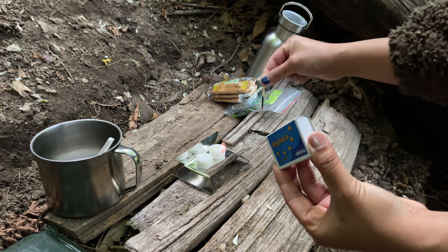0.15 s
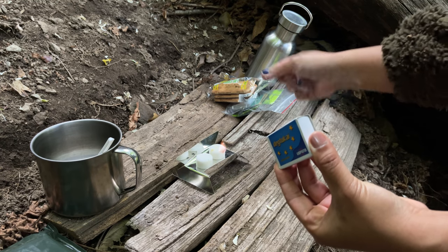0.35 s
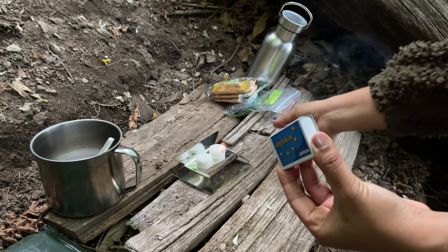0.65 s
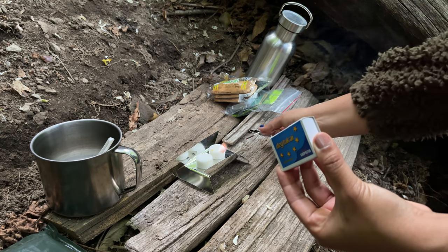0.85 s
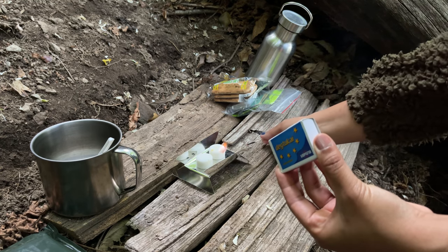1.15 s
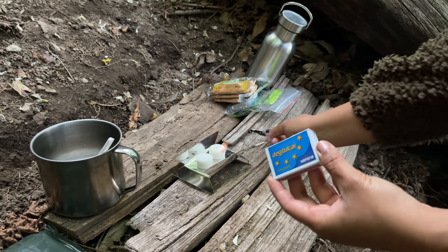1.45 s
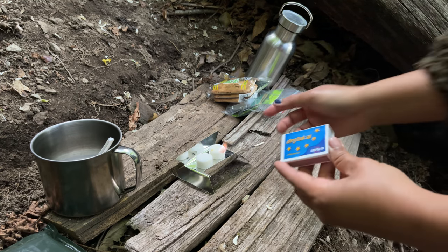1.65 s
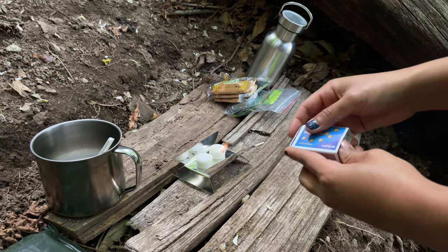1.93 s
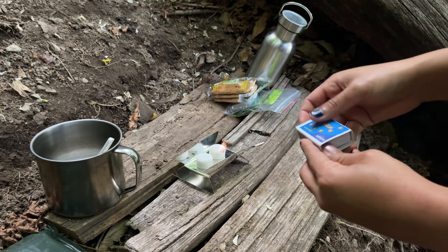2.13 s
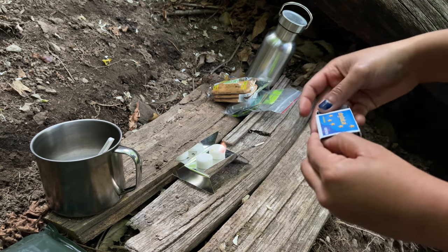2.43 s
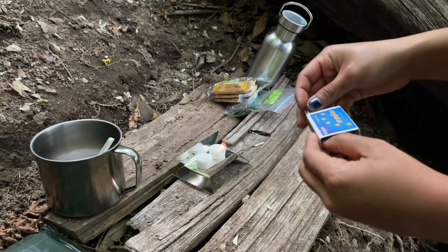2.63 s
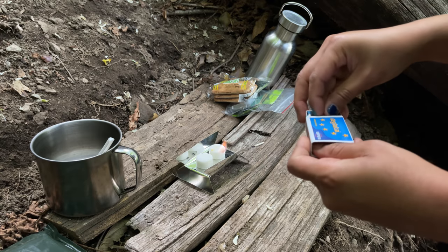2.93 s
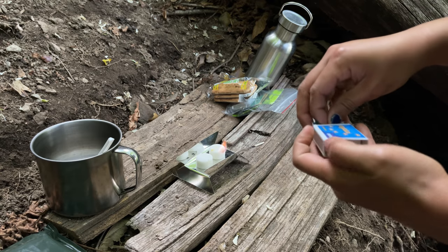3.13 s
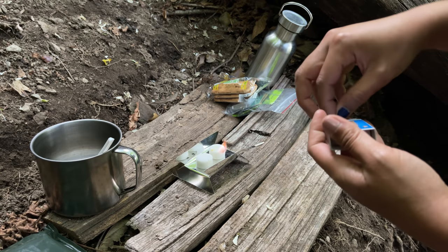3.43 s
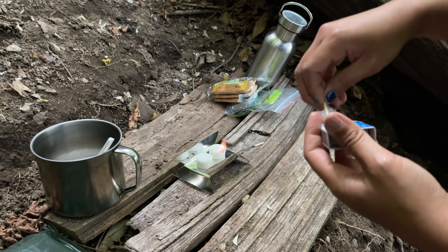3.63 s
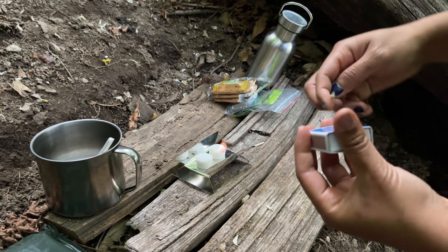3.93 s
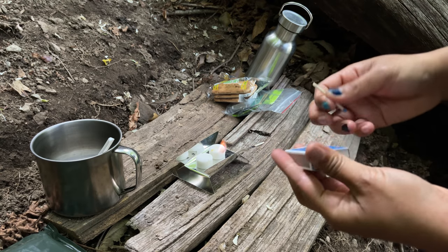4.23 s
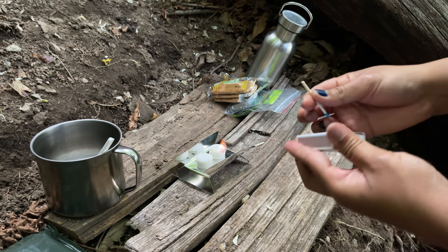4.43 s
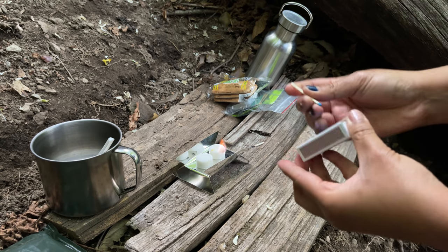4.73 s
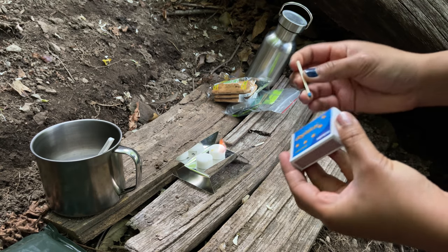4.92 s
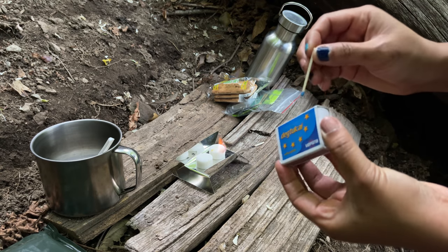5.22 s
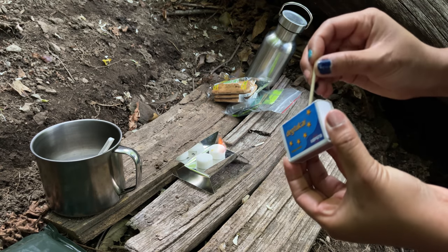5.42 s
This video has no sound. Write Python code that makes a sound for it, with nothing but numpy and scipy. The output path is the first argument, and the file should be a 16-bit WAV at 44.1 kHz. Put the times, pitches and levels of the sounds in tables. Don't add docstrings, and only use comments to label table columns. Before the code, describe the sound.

A cardboard matchbox is handled close to a phone in quiet woodland. Faint crickets and leaf hush run throughout; far birds whistle early and a nearby bird gives two quick rising chirps. Rubs and light ticks grow into a busy rattle around three seconds, then a sharp, bright snap of the tray just before four, followed by sparser scuffs and a final click.

```python
import sys
import numpy as np
from scipy import signal
from scipy.fft import rfft, irfft
from scipy.io import wavfile
from scipy.ndimage import uniform_filter1d

SR = 44100
rng = np.random.default_rng(int(sys.argv[2]) if len(sys.argv) > 2 else 0)


def unload_wav(signal):
    wavfile.write(
        sys.argv[1],
        SR,
        np.round(np.clip(np.atleast_2d(signal).T, -1, 1) * 32767).astype(np.int16),
    )


def field_ratio(decibels):
    return 10 ** (np.asarray(decibels, dtype=float) / 20)


N = 245637
TIME = np.arange(N) / SR
LEFT_RIGHT = np.array([[1], [-1]])


def noise():
    return rng.standard_normal(N)


def unit(x):
    return x / np.sqrt(np.mean(x ** 2))


def span(start_s, end_s):
    return slice(max(int(start_s * SR), 0), int(end_s * SR))


def lowpass(x, hz):
    return signal.lfilter(*signal.butter(2, hz, fs=SR), x)


def highpass(x, hz):
    return signal.sosfilt(signal.butter(4, hz, "high", fs=SR, output="sos"), x)


def band(x, hz, width_hz):
    return signal.lfilter(*signal.iirpeak(hz, hz / width_hz, SR), x)


def body(x, modes):
    total = 0
    for k, (hz, width_hz, db) in enumerate(modes):
        total = total + (-1) ** k * field_ratio(db) * band(x, hz, width_hz)
    return unit(total)


def walk(rate_hz):
    size = int(SR / rate_hz)
    held = np.repeat(rng.standard_normal(N // size + 1), size)
    return unit(uniform_filter1d(uniform_filter1d(held, size), size)[:N])


def bell(size, edge):
    u = np.linspace(0, 1, size)
    return np.sin(np.pi / 2 * np.clip(np.minimum(u, 1 - u) / edge, 0, 1)) ** 2


def scatter(x, t60_s, wet_db, cross_db, dull_hz):
    t = TIME[:SR // 2]
    decay = np.exp(-np.log(1000) * t / t60_s) * np.clip(t / 0.0017, 0, 1)
    lumps = field_ratio(2.0 * walk(500)[:len(t)]) * decay
    mid, side = rng.standard_normal((2, len(t))) * lumps
    tails = field_ratio(wet_db) / np.sqrt(np.sum(mid ** 2)) * np.array([mid, field_ratio(cross_db) * side])
    mid, side = signal.oaconvolve(x[None], lowpass(tails, dull_hz), axes=1)[:, :N]
    return x + mid + side * LEFT_RIGHT


# frequency in Hz, density in dB per Hz.
HUSH_COLOUR = [(12, -35), (20, 2.5), (48, -6), (98, -8), (466, -10.5), (550, -15), (1310, -13),
               (1590, -11.5), (1820, -10.5), (3010, -6), (3560, -5.5), (5260, -11), (7550, -14),
               (8440, -16), (14300, -34.5), (15600, -35)]
# frequency in Hz, side minus mid in dB.
HUSH_WIDTH = [(60, -2.5), (110, -1.5), (200, -3.5), (380, -7.5), (700, -5.5), (1290, -8.5), (2380, -19),
              (4400, -10), (8120, 0), (15000, -7)]


def hush():
    log_hz = np.log(np.fft.rfftfreq(N, 1 / SR) + 1)
    colour_hz, colour_level_db = np.transpose(HUSH_COLOUR)
    width_hz, width_level_db = np.transpose(HUSH_WIDTH)
    colour_db = np.interp(log_hz, np.log(colour_hz), colour_level_db)
    side_db = np.interp(log_hz, np.log(width_hz), width_level_db)
    mid = irfft(rfft(noise()) * field_ratio(colour_db), N)
    side = irfft(rfft(noise()) * field_ratio(colour_db + side_db), N)
    side = side + 0.18 * lowpass(mid, 300)
    leaves = field_ratio(-59.5 + 0.5 * walk(0.78)) * (mid + side * LEFT_RIGHT) / np.std(mid)
    breeze = np.array([field_ratio(db + 8.7 * np.tanh(walk(4.6))) * walk(50) for db in (-84, -86)])
    return leaves + breeze


# tone in Hz, width in Hz, chirps per second, level in dB, side share 0-1.
CRICKET_VOICES = [
    (7804, 140, 63, -69.5, 0.8),
    (6780, 200, 64.4, -68.5, 0.54),
    (5770, 350, 61, -71.5, 0.7),
    (7320, 410, 77, -71.5, 0.8),
]


def crickets():
    out = 0
    for hz, width_hz, rate_hz, db, side_share in CRICKET_VOICES:
        beat = np.sin(2 * np.pi * np.cumsum(rate_hz * (1 + 0.008 * walk(3))) / SR)
        stroke = (0.5 + 0.5 * beat) ** 1.2 + 0.2

        def wing():
            tone = np.sin(2 * np.pi * np.cumsum(hz + 0.3 * width_hz * walk(90)) / SR)
            rasp = unit(band(band(noise(), hz, width_hz), hz, 2.9 * width_hz))
            return unit(stroke * (tone + 0.36 * rasp))

        mid, side = wing(), wing()
        out = out + field_ratio(db + 0.8 * walk(1.96)) * (mid + side_share * side * LEFT_RIGHT)
    return out


def chatter():
    notes, note_s = 70, 0.025
    when, pitch, bend, length, size = rng.random((notes, 5)).T
    start_s = when * (N / SR - 3 * note_s)
    hz = 2300 + 1900 * pitch
    return list(zip(start_s, note_s * (0.5 + length), hz, hz * (0.88 + 0.24 * bend), -70 + 7 * size))


# start in seconds, length in seconds, first Hz, last Hz, level in dB.
FAR_WHISTLES = [(0.209, 0.029, 2840, 2610, -58), (0.241, 0.021, 2630, 2930, -59.5),
                (0.258, 0.082, 3040, 3040, -61), (0.346, 0.045, 2500, 2300, -63),
                (.475, .015, 3820, 3800, -54), (0.489, 0.031, 3500, 3580, -59.5),
                (0.572, 0.025, 5540, 4700, -61), (0.587, 0.071, 4640, 4430, -55.5),
                (0.685, 0.033, 3850, 3450, -59), (0.849, 0.14, 3210, 3070, -58.5),
                (0.989, 0.073, 2650, 2790, -60.5), (1.05, 0.034, 2190, 2128, -60.5),
                (1.19, 0.06, 3204, 3123, -59.5), (1.246, 0.081, 3210, 3260, -56.5),
                (1.293, 0.053, 2350, 2350, -61), (1.34, 0.063, 2350, 2020, -54.5),
                (1.41, 0.06, 2043, 2205, -60.5), (1.348, 0.053, 2700, 2810, -57),
                (1.746, 0.116, 2650, 2653, -59), (1.8, 0.14, 2552, 2580, -56),
                (1.988, 0.16, 2660, 2663, -58.5), (2.094, 0.032, 3650, 3410, -56),
                (2.38, 0.092, 2290, 2330, -57), (2.461, 0.071, 2310, 1965, -57),
                (2.658, 0.11, 2600, 2540, -59), (1.467, 0.073, 2250, 2282, -62),
                (1.557, 0.089, 2050, 1760, -63)]
# start in seconds, length in seconds, centre in Hz, width in Hz, level in dB.
FAR_TRILLS = [
    (3.925, 0.084, 3000, 400, -68),
    (4.264, 0.18, 2840, 453, -62.5),
    (4.75, 0.14, 2870, 450, -62.5),
    (5.027, 0.096, 5000, 450, -66),
]


def far_birds():
    out, breath = np.zeros(N), noise()
    waver = 1 + 0.013 * walk(90) + 0.01194 * walk(18)
    flutter = field_ratio(2.0 * walk(70))
    for start, length, first_hz, last_hz, db in FAR_WHISTLES + chatter():
        at = span(start, start + length)
        hz = np.interp(TIME[at], [start, start + length], [first_hz, last_hz]) * waver[at]
        out[at] += field_ratio(db - 0.5) * bell(len(hz), edge=0.13) * np.sin(2 * np.pi * np.cumsum(hz) / SR)
    for start, length, hz, width_hz, db in FAR_TRILLS:
        at = span(start, start + length)
        hoarse = unit(band(band(breath[at], hz, width_hz), hz, width_hz))
        out[at] += field_ratio(db + 1.0) * bell(len(hoarse), edge=0.11) * hoarse
    return scatter(out * flutter, t60_s=0.57, wet_db=2.0, cross_db=-37, dull_hz=6000)


def heartbeat():
    first_s, every_s, again_s, length_s = 0.26, 0.935, 0.24, 0.07
    late = (TIME - first_s + every_s / 4) % every_s - every_s / 4
    nudges = sum(np.exp(-((late - s) / length_s) ** 2) for s in (0, again_s))
    return field_ratio(np.array([[-65], [-67]])) * nudges * walk(25)


# start in seconds, swell in seconds, peak in dB, after-note in dB, after-note in Hz.
CALLS = [
    (1.0, 0.07, -39, -49.5, 6550),
    (3.189, 0.064, -39, -62, 6270),
]
# delay in seconds, level in dB.
TRUNK_ECHOES = [
    (0.044, -7),
    (0.082, -7.5),
    (.118, -11.5),
]


def near_bird():
    first_hz, top_hz, glide_s = 3650, 6398, 0.026
    after_wait_s, after_length_s = 0.026, 0.047
    out, octave = np.zeros(N), np.zeros(N)
    flutter_db = 7.5 * np.tanh(walk(400))
    for start, swell, peak_db, after_db, after_hz in CALLS:
        at = span(start, start + swell + 0.04)
        t = TIME[at] - start
        hz = top_hz - (top_hz - first_hz) * np.exp(-t / glide_s)
        phase = 2 * np.pi * np.cumsum(hz) / SR
        swell_db = -13 * np.clip(1 - t / swell, 0, 1) ** 1.07
        cut_db = -1500 * np.maximum(t - swell, 0)
        gain = field_ratio(peak_db + swell_db + cut_db + flutter_db[at]) * np.clip(t / 0.0083, 0, 1)
        out[at] = gain * np.sin(phase)
        octave[at] = field_ratio(-38.5) * gain * np.sin(2 * phase)
        after_s = start + swell + after_wait_s
        at = span(after_s, after_s + after_length_s)
        note = np.sin(2 * np.pi * after_hz * TIME[at])
        out[at] += field_ratio(after_db + flutter_db[at]) * bell(len(note), edge=0.5) * note
    soft = lowpass(out, 2800)
    out = out + sum(field_ratio(db + 9.0) * np.roll(soft, int(late * SR)) for late, db in TRUNK_ECHOES)
    return (scatter(out, t60_s=0.38, wet_db=14.5, cross_db=-3.0, dull_hz=2500)
            + scatter(octave, t60_s=0.53, wet_db=12.0, cross_db=-1, dull_hz=15000))


# time in seconds, peak in dB, ring in Hz.
PANEL_HITS = [(1.423, -41, 2150), (1.75, -33, 2620), (1.799, -38, 2610), (2.4626, -38, 2250),
              (2.9178, -24, 2360), (3.056, -23.5, 2380), (3.0844, -32, 2290), (3.2818, -33, 2520),
              (3.338, -32, 2450), (3.417, -29, 2380), (3.4302, -26.5, 2300), (3.449, -28, 2250),
              (3.4648, -27.5, 2350), (4.075, -42.5, 2020), (4.7182, -50, 2410), (5.403, -37, 1670),
              (5.4184, -35, 2100), (5.425, -30, 1940), (5.443, -19.5, 2300), (5.4552, -42, 2230),
              (5.485, -41, 2050)]
# time in seconds, peak in dB, ring in Hz.
EDGE_HITS = [(1.2729, -34, 3240), (1.712, -33, 2800), (1.7399, -27.5, 3320), (2.3433, -30, 2980),
             (2.8984, -29, 3300), (3.0706, -30, 3520), (4.339, -33.5, 2920), (4.4475, -29, 3000),
             (4.7674, -34, 2850), (5.391, -33.5, 2800), (5.447, -23, 2830), (5.4674, -36, 3430)]
# time in seconds, peak in dB, ring in Hz.
TRAY_HITS = [(1.507, -34, 3820), (1.7863, -30.5, 4700), (2.456, -25.5, 4800), (2.9315, -23, 3760),
             (3.339, -28.5, 4500), (3.4924, -29, 4200), (3.5084, -29, 4170), (3.601, -38, 4130),
             (3.624, -34.5, 4100), (3.803, -35, 4220), (4.4542, -25, 4040), (4.4685, -27, 4160),
             (4.9277, -36, 4100), (4.9727, -28, 3920), (5.0234, -44, 5050), (5.2914, -34.5, 3900),
             (5.315, -33, 4040)]
# time in seconds, peak in dB, ring in Hz.
MATCH_CATCHES = [(2.862, -38, 2500), (2.8747, -22, 3050), (2.886, -29, 2390), (2.908, -24.5, 3600),
                 (2.9427, -23, 2410), (2.981, -35, 2840), (2.991, -27.5, 2380), (2.993, -32, 4740),
                 (3.043, -35, 2500), (3.060, -29, 3980), (3.3735, -34, 4540), (3.379, -31.5, 2420),
                 (3.383, -30, 4270), (3.425, -30, 2340), (3.432, -28, 5240), (3.853, -29.5, 2150),
                 (3.874, -22, 2150), (3.887, -23, 8000), (3.892, -18, 7800), (3.898, -19, 8900),
                 (3.906, -20, 8900), (3.912, -20, 4480), (4.458, -29, 4200), (4.4595, -31, 6300),
                 (4.4653, -34, 1780), (4.473, -29, 4320), (4.485, -29, 7000), (4.500, -40, 1770),
                 (4.933, -40, 3800), (4.955, -35, 3930), (4.960, -32.5, 3000), (4.9917, -33.5, 4270),
                 (4.999, -40, 3900), (5.161, -41, 3920), (5.433, -37, 1560), (5.4715, -38, 3420),
                 (2.370, -30, 4120), (1.753, -40, 4350)]
# sharpness in dB, t60 in seconds, rise in seconds.
STRUCK_PARTS = [
    (-18.5, 0.013, 0.00052),
    (-15.5, 0.0097, 0.00069),
    (-27, 0.0072, 0.0005),
    (-21, 0.013, 0.0013),
]
# time in seconds, peak in dB, ring in Hz, sharpness in dB.
NAIL_SNAPS = [(1.257, -32.5, 3330, -4), (2.0935, -39, 7000, 4), (3.8688, -26, 1970, -22),
              (3.892, -22, 4260, -17), (3.8987, -22, 4070, -3), (3.903, -18, 4040, -14),
              (3.9067, -20, 4660, -14), (3.9415, -34, 6440, 4), (4.4877, -30, 4130, -6),
              (3.4415, -38, 8500, -5), (3.0724, -32, 6700, 0), (4.5188, -28, 2850, -1.5),
              (4.7439, -27.5, 3830, 0)]


def knocks():
    rows = []
    for hits, part in zip((PANEL_HITS, EDGE_HITS, TRAY_HITS, MATCH_CATCHES), STRUCK_PARTS):
        rows += [(*hit, *part) for hit in hits]
    snap_t60_s, snap_rise_s = 0.0088, 0.00037
    return rows + [(*snap, snap_t60_s, snap_rise_s) for snap in NAIL_SNAPS]


def ticks():
    out, t = np.zeros(N + SR), np.arange(SR // 20) / SR
    for start, peak_db, hz, sharp_db, t60_s, rise_s in knocks():
        chance = rng.standard_normal(len(t))
        fade = np.exp(-np.log(1000) * t / t60_s) * np.clip(t / rise_s, 0, 1) ** 2
        fade = fade / fade.max()
        ring = np.sin(2 * np.pi * hz * t) * fade
        rattle = band(band(chance, 1.06 * hz, 3800), 2750, 4500) * fade ** 0.65
        crack = band(band(chance, 6900, 7500), 4500, 10000) * fade ** 1.9
        crack = field_ratio(0.66 * sharp_db + 7.5) * lowpass(lowpass(crack, 12500), 12500)
        i = int(start * SR)
        out[i:i + len(t)] += field_ratio(peak_db - 4.5) * (lowpass(ring + rattle, 8000) + crack)
    return out[:N]


# firmest in seconds, rise in seconds, fall in seconds, level in dB, brightness in dB.
DRAGS = [(1.877, 0.017, 0.036, -56.5, -6), (2.016, 0.077, 0.051, -51, 3), (2.172, 0.038, 0.046, -50, 3.5),
         (2.29, 0.11, .017, -56.5, 6), (2.337, 0.043, 0.024, -47.5, 3.5), (2.37, 0.028, 0.029, -45.5, -1),
         (2.457, 0.037, 0.062, -52.5, -1.5), (2.592, 0.034, 0.077, -50.5, -5),
         (2.755, 0.0065, 0.055, -48, 6), (2.915, 0.028, 0.03, -41, 2.5), (3.149, 0.032, 0.048, -48, -6),
         (3.432, 0.029, 0.021, -41, 2), (3.511, 0.021, 0.047, -50.5, -7), (3.587, .041, 0.012, -56, -2),
         (3.622, 0.034, 0.012, -49, -6), (3.806, 0.057, 0.021, -58, 3), (3.897, 0.036, 0.0043, -34.5, 7),
         (3.913, 0.0095, 0.0032, -32.5, 9), (4.133, 0.031, 0.025, -54, 2), (4.232, 0.047, 0.043, -49.5, 0),
         (4.341, 0.062, 0.037, -65.5, 15), (4.472, 0.033, 0.027, -51, 0), (4.59, 0.049, 0.082, -54, -1),
         (4.745, 0.032, 0.034, -48, -1), (4.963, 0.02, 0.019, -46, -1.5)]
# firmest in seconds, length in seconds, level, brightness in dB.
QUICK_SCUFFS = [(1.265, 0.036, -51, 0), (1.51, 0.031, -54, -10), (1.703, 0.05, -58, -7),
                (1.742, 0.046, -60, -8), (1.789, 0.033, -53.5, -7), (1.833, 0.039, -58, -12),
                (1.967, 0.033, -49, -15), (2.098, 0.068, -56, 0), (2.872, 0.04, -42.5, 6),
                (2.936, 0.024, -42, -2), (2.956, 0.041, -48.5, -4), (2.99, 0.03, -42, -4),
                (3.019, 0.046, -47.5, -4), (3.054, 0.046, -44, 2), (3.081, 0.02, -48, 5.5),
                (3.102, 0.036, -46.5, -9), (3.246, 0.03, -49.5, 4), (3.346, 0.054, -56, -11),
                (3.379, 0.022, -46, -13), (3.467, 0.077, -51, -4), (3.859, 0.036, -45.5, -3),
                (3.874, 0.048, -36.5, -5), (3.928, 0.022, -48, 3), (4.456, 0.024, -46.5, 0),
                (4.992, 0.03, -53, -5), (5.172, 0.03, -53.5, -4), (5.3, 0.071, -63, -14),
                (5.42, 0.024, -65, -8), (5.451, 0.014, -43, -11), (5.466, 0.012, -44, -3)]
# panel, tray, paper in dB per dB.
BRIGHTNESS_SLOPES = (-0.35, 0.37, 0.54)


def rubs():
    rise_share = 0.39
    rows = [(*drag, -11.5) for drag in DRAGS]
    for firm, length, db, bright_db in QUICK_SCUFFS:
        rows.append((firm, rise_share * length, (1 - rise_share) * length, db, bright_db, -17.5))
    ease = 1.42
    out = []
    for firm, rise, fall, db, bright_db, paper_db in rows:
        levels_db = db + bright_db * np.array(BRIGHTNESS_SLOPES) + paper_db * np.array([0, 0, 1])
        out.append((firm, ease * rise, ease * fall, levels_db))
    return out


def tray_out():
    return (TIME > 2.9) & (TIME < 3.885)


# mode in Hz, width in Hz, level in dB.
PANEL_MODES = [(2250, 570, 3), (3000, 750, 2.5)]
# mode in Hz, width in Hz, level in dB.
TRAY_MODES = [(4170, 800, 4), (5000, 1540, -1.5), (6620, 920, -1.5)]
# mode in Hz, width in Hz, level in dB.
PAPER_MODES = [(7570, 480, 7), (8200, 1750, 1.5), (11170, 1350, 0), (13100, 5700, -12)]
# mode in Hz, width in Hz, level in dB.
CAVITY_MODES = [(1570, 296, 0.0)]


def rubbing():
    grains = rng.random(N) < 1500 / SR
    grit = unit(noise() * grains * field_ratio(1.9 * rng.exponential(size=N)))
    hold_from_s, hold_to_s, hold_fade_s, hold_db = 1.36, 5.56, 0.36, (-63.5, -65, -76.5)
    held = np.clip(np.minimum(TIME - hold_from_s, hold_to_s - TIME) / hold_fade_s, 0, 1)
    held = held * field_ratio(3.96 * walk(7.0))
    power = np.outer(field_ratio(hold_db), held) ** 2
    for firm, rise, fall, levels_db in rubs():
        at = span(firm - rise, firm + fall)
        ramp = np.interp(TIME[at], [firm - rise, firm, firm + fall], [0, 1, 0])
        pressure = np.sin(np.pi / 2 * ramp) ** 1.96
        power[:, at] += np.outer(field_ratio(levels_db) ** 2, pressure ** 2)
    push = np.clip((10 * np.log10(power.sum(0) + 1e-18) + 56) / 24, 0.1, 1)
    fits = field_ratio(push * (3.24 * walk(300) + 0.8 * walk(70) - 1.5))
    drag = fits * (noise() + 0.96 * push * grit) / np.hypot(1, 0.45 * push)
    cavity_db = np.where(tray_out(), -21, -8.5)
    out = -np.sqrt(power[0]) * field_ratio(cavity_db + 2.66 * walk(45)) * body(drag, CAVITY_MODES)
    trims = field_ratio([-3.0, -0.8, 3.5]) * [1, 1, -1]
    for gain, trim, modes in zip(np.sqrt(power), trims, (PANEL_MODES, TRAY_MODES, PAPER_MODES)):
        out = out + gain * trim * field_ratio(2.24 * walk(60)) * body(drag, modes)
    return out


def matchbox():
    dry = rubbing() + ticks()
    hands = np.where(tray_out(), highpass(dry, 1520), highpass(dry, 1166))
    return scatter(hands, t60_s=0.041, wet_db=-15.5, cross_db=-26.5, dull_hz=14100)


def scene():
    return hush() + crickets() + far_birds() + heartbeat() + near_bird() + matchbox()


def low_pass(x):
    return signal.sosfilt(signal.butter(12, 15730, fs=SR, output="sos"), x)


def record(dry):
    mix = signal.sosfilt(signal.ellip(8, 0.2, 60, 15650, fs=SR, output="sos"), dry)
    return low_pass(mix)


dry = scene()
out = record(dry)
unload_wav(out)
```